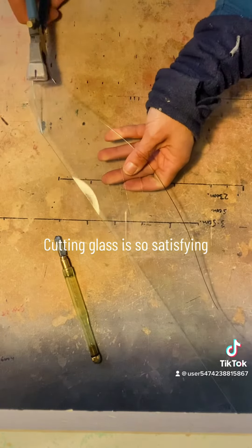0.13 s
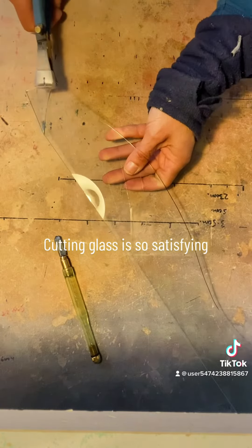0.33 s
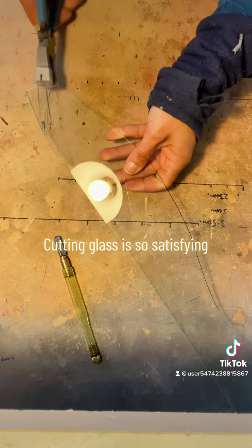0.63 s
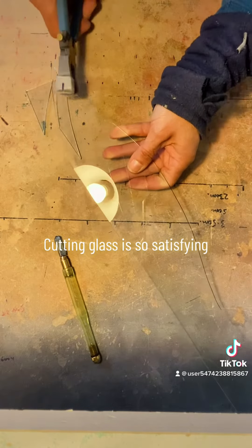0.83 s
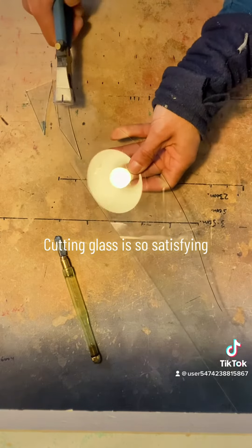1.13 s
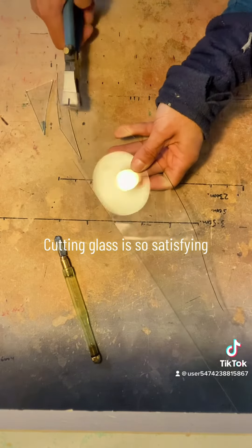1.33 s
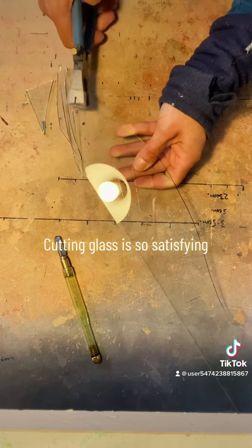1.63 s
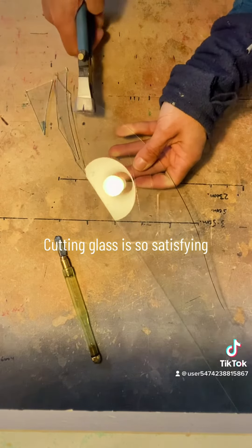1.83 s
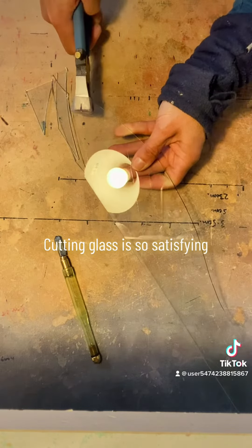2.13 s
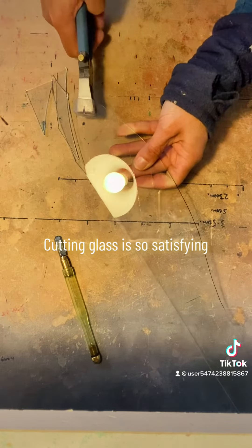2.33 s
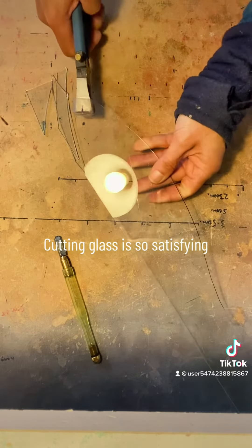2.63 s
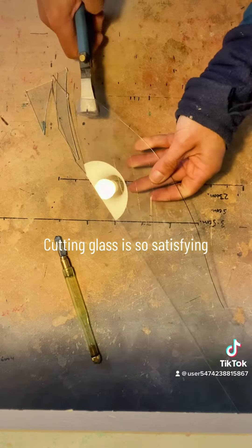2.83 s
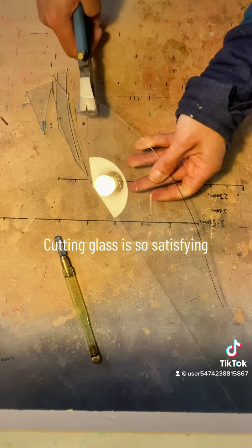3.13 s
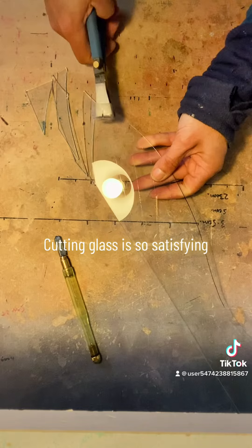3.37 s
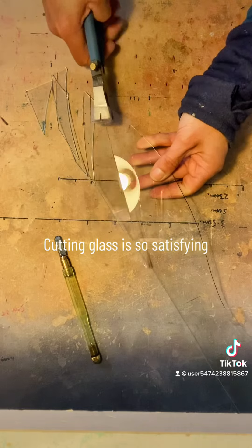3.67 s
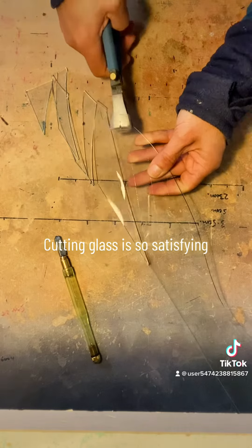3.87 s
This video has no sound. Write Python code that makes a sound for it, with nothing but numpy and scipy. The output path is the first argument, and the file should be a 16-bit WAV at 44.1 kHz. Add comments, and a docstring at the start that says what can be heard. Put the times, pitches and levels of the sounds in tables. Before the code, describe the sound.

Glass strips are snapped with pliers in sharp gritty cracks, each offcut then clinking and knocking onto a wooden bench, with small ticks and faint rustles between, heard close from above in a small workshop.

```python
"""Glass strips snapped and laid down

Pliers snap strips off a scored glass sheet: gritty noise swells and dies, the sheet's modes ring, splinters hiss.
Each offcut is laid on a wooden bench: decaying modes give its knocks and ring, noise bursts its buzz and cracks.
Small ticks and grainy rustles of handling lie between, over a low workshop rumble of shaped noise.
A diffuse room tail surrounds the near sounds; two microphone ports listen from above."""
import sys
import numpy as np
from scipy import signal
from scipy.fft import rfft, irfft
from scipy.io import wavfile

SR = 44100
rng = np.random.default_rng(int(sys.argv[2]) if len(sys.argv) > 2 else 0)


def store_pcm(level_fs):
    """Save levels as 16-bit WAV."""
    pcm = np.round(np.clip(level_fs, -1, 1) * 32767).astype(np.int16)
    wavfile.write(sys.argv[1], SR, np.atleast_2d(pcm).T)


N = 176400


def amp(db):
    """dB to gain."""
    return 10 ** (np.asarray(db) / 20)


def rms_one(x):
    """Scale to rms 1."""
    return x / np.sqrt(np.mean(x ** 2) + 1e-20)


def in_time(rows):
    """Interpolate (time, value) rows at every sample."""
    return np.interp(np.arange(N) / SR, *np.transpose(rows))


def at_hz(points, hz):
    """Interpolate (hz, value) points over log frequency."""
    points_hz, values = np.array(points).T
    return np.interp(np.log(hz + 1), np.log(points_hz), values)


def coloured(x, spectrum):
    """Give white input a spectrum; rms 1."""
    gain = amp(at_hz(spectrum, np.fft.rfftfreq(len(x), 1 / SR)))
    return rms_one(irfft(rfft(x) * gain, len(x)))


def drift(steps_per_s):
    """Normal random steps joined by straight lines."""
    steps = rng.standard_normal(2000)
    return np.interp(np.arange(N) / SR * steps_per_s, np.arange(len(steps)), steps)


RING_WAVERS_PER_S = 150


def struck(start_s, blow_db, modes, scatter_db, favoured_hz=None, focus_db_per_octave=0,
           damps_db=0, rise_s=1e-4, waver_db=0):
    """Blows ring modes, most near a favoured pitch; later blows damp them, loose contact makes them waver."""
    t = np.arange(SR // 3) / SR
    ringing = np.zeros((len(modes), N + SR))
    hz, level_db, t60_s = np.transpose(modes)[:, :, None]
    chance = rng.standard_normal((len(start_s), len(modes), 1))
    order = np.sort(start_s)
    for k, at_s in enumerate(start_s):
        off_db = 0
        if favoured_hz is not None:
            off_db = -focus_db_per_octave * abs(np.log2(hz / favoured_hz[k]))
        # count of later blows so far
        later = np.searchsorted(order, at_s + t) - np.searchsorted(order, at_s + 1e-4)
        gain_db = blow_db[k] + level_db + off_db + scatter_db * chance[k]
        gain_db = gain_db - 60 * t / t60_s - damps_db * np.maximum(later, 0)
        i = int(at_s * SR)
        ringing[:, i:i + len(t)] += amp(gain_db) * np.sin(2 * np.pi * hz * t) * np.minimum(t / rise_s, 1)
    out = np.zeros(N)
    for k, mode in enumerate(ringing):
        out += (-1) ** k * amp(waver_db * drift(RING_WAVERS_PER_S)) * mode[:N]
    return out


CRACK_RISE_S = .0006


def bursts(start_s, level_db, t60_s, spectrum, run_s=0, rise_s=CRACK_RISE_S):
    """Noise that rises fast, holds for run_s from its start, then dies; bursts add in power."""
    power, t = np.zeros(N), np.arange(SR // 4) / SR
    for at_s, db, decay_s in zip(start_s, level_db, t60_s + 0 * start_s):
        envelope = amp(db - 60 * np.maximum(t - run_s, 0) / decay_s) * np.minimum(t / rise_s, 1)
        i = int(at_s * SR)
        power[i:i + len(t)] += envelope[:N - i] ** 2
    return np.sqrt(power) * coloured(rng.standard_normal(N), spectrum)


# modes of held sheet and pliers: pitch_hz [Hz], level_db [dB, relative], t60_s [s]
SHEET_MODES = [(1800, -7, .04), (2350, -9, .04), (3350, -7, .04), (4500, -7, .035), (5400, -9, .03),
               (6100, -3, .035), (6750, -4, .03), (7600, -5, .03), (8750, -5, .03), (9900, -9, .03)]
# modes of bench top: pitch_hz [Hz], level_db [dB, relative], t60_s [s]
BENCH_MODES = [(213.3, -25, 0.11), (390.5, -25, 0.12), (660, -21, 0.057), (879, -19.5, 0.041),
               (1094.7, -4, 0.028), (1146, -9, 0.013), (1359, -7.5, 0.025), (1604, -0.5, 0.017),
               (1660, -19.5, 0.023), (2080, -12.5, 0.013), (2173, -3.5, 0.033), (2330, -6, 0.025),
               (2660, -7, 0.023), (3500, -12.5, 0.0067)]
GRAINS_PER_S_PER_MODE = 2500 / len(SHEET_MODES + BENCH_MODES)


def grains():
    """Grit under the glass: each grain rings one mode of the sheet or the bench top."""
    out = 0
    for hz, _, t60_s in SHEET_MODES + BENCH_MODES[1:]:
        r, w = amp(-60 / (t60_s * SR)), 2 * np.pi * hz / SR  # pole radius, angle
        hits = rng.random(N) < GRAINS_PER_S_PER_MODE / SR
        clicks = hits * rng.standard_normal(N)
        ring = signal.lfilter([np.sin(w)], [1, -2 * r * np.cos(w), r * r], clicks + 1e-18)
        out = out + np.sqrt(hz) * rms_one(ring)
    return rms_one(out)


# rustle of sleeve and shards: time_s [s], level_db [dB]
HANDLING = [(0, -54), (.14, -57), (.27, -72), (.41, -56), (.56, -66), (.66, -52), (.91, -67), (1.05, -64),
            (1.4, -57), (1.58, -53), (1.73, -52), (1.78, -56), (1.94, -85), (2.9, -90), (3.04, -80),
            (3.16, -60), (3.22, -49), (3.4, -52), (3.6, -58), (3.73, -46), (3.85, -44), (4, -55)]
# soft swells of grainy noise: start_s [s], length_s [s], level_db [dB]
SWELLS = [(0.519, 0.085, -50.5), (0.934, 0.053, -54), (2.19, 0.081, -73), (2.32, 0.07, -77.5),
          (2.38, 0.15, -60), (2.583, 0.035, -66), (2.629, 0.038, -52), (2.839, 0.14, -75),
          (2.969, 0.12, -54), (3.061, 0.054, -60), (3.518, 0.039, -69), (3.643, 0.072, -47.5)]
# rustle spectrum: freq_hz [Hz], density_db [dB per Hz, relative]
RUSTLE_SPECTRUM = [(180, -26.5), (350, -10), (1000, -17.5), (1800, -4.5), (3200, -8.5), (5400, -2),
                   (7200, -4), (8500, -10.5), (11000, -10), (15600, -14.5), (16500, -37.5)]
GRAIN_SHARE, RUSTLE_FLICKER_DB, RUSTLE_FLICKERS_PER_S = .45, 3, 120


def rustle():
    """Fine grains on hiss, following the handling level, with soft swells added."""
    t = np.arange(N) / SR
    source = GRAIN_SHARE * grains() + (1 - GRAIN_SHARE) * rng.standard_normal(N)
    level = amp(in_time(HANDLING))
    for start_s, length_s, level_db in SWELLS:
        level = level + amp(level_db) * np.sin(np.pi * np.clip((t - start_s) / length_s, 0, 1)) ** .5
    flicker = amp(RUSTLE_FLICKER_DB * drift(RUSTLE_FLICKERS_PER_S))
    return level * flicker * coloured(source, RUSTLE_SPECTRUM)


# rumble level: time_s [s], level_db [dB]
RUMBLE_LEVEL = [(0.0, -86), (0.07, -42), (0.13, -40.5), (0.3, -75), (0.34, -50.5), (0.49, -47),
                (0.6, -63.5), (0.69, -48), (0.71, -39.5), (0.89, -58), (0.93, -50.5), (1.05, -60.5),
                (1.12, -47), (1.17, -58), (1.38, -39), (1.54, -66.5), (1.65, -41), (1.77, -53.5),
                (1.88, -39), (1.9, -53), (2.13, -75.5), (2.48, -54.5), (2.57, -81.5), (2.64, -55.5),
                (2.83, -82), (2.87, -55.5), (3.0, -72.5), (3.03, -41), (3.19, -61.5), (3.29, -44.5),
                (3.31, -51.5), (3.54, -49.5), (3.65, -74), (3.73, -40), (3.81, -51), (3.83, -37),
                (3.89, -53.5), (4.0, -52)]
# rumble spectrum: freq_hz [Hz], density_db [dB per Hz, relative]
RUMBLE_SPECTRUM = [(12, -51.5), (22, -23), (36, -14), (60, -3), (108, -12), (147, 3), (248, -8.5),
                   (312, -23), (390, -17), (500, -22), (650, -55.5), (1100, -120)]


def rumble():
    """Low lumpy noise with a swelling and sinking level."""
    return amp(in_time(RUMBLE_LEVEL)) * coloured(rng.standard_normal(N), RUMBLE_SPECTRUM)


# bench top buzz: freq_hz [Hz], density_db [dB per Hz, relative]
BUZZ_SPECTRUM = [(150, -29.5), (350, -7.5), (700, -12), (1100, -1.5), (2300, -4), (3500, -10), (6000, -31)]
KNOCK_DB, KNOCK_SCATTER_DB = -10.5, 4.5
BUZZ_DB, BUZZ_T60_S = -20, 0.1


def knocks(start_s, knock_db):
    """The bench top's modes ring briefly and it buzzes."""
    ring = struck(start_s, knock_db + KNOCK_DB, BENCH_MODES, KNOCK_SCATTER_DB)
    return ring + bursts(start_s, knock_db + BUZZ_DB, BUZZ_T60_S, BUZZ_SPECTRUM)


# small ticks of pliers and shards: start_s [s], knock_db, crack_db [dB, relative]
TICKS = [(0.045, -35.5, -32.5), (0.529, -56, -22.5), (0.628, -54.5, -29), (0.645, -59, -28),
         (0.937, -98, -37.5), (0.973, -62, -43.5), (1.019, -75, -40.5), (1.079, -55, -46),
         (1.123, -66.5, -81), (1.139, -71, -34.5), (1.197, -54, -35.5), (1.268, -39.5, -49),
         (1.283, -50, -38), (1.325, -41, -59), (1.349, -31, -64.5), (1.547, -57, -32), (2.186, -65, -63.5),
         (2.222, -45.5, -50.5), (2.323, -51.5, -70), (2.41, -55.5, -56), (2.473, -56, -52),
         (2.607, -52, -43.5), (2.639, -48, -49.5), (2.701, -75, -58), (2.867, -58.5, -63.5),
         (3.155, -55, -28.5), (3.197, -36, -29), (3.425, -38, -34.5), (3.56, -62, -22), (3.625, -58, -32)]
# crack of glass: freq_hz [Hz], density_db [dB per Hz, relative]
CRACK_SPECTRUM = [(300, -29.5), (600, -22.5), (1200, -22.5), (2000, -5.5), (3000, -7), (5000, -6),
                  (6200, 1.5), (7500, -2.5), (9000, -5), (12000, -2.5), (15000, -6), (16500, -29)]
CRACK_DB = -6.5  # shared by ticks, touches, snaps
TICK_T60_S, TICK_RING_DB = .05, -10.5
SHEET_SCATTER_DB, RING_RISE_S, RING_WAVER_DB = 4.5, .001, 5


def ticks():
    """Faint contacts: a knock, a noise burst and a slight ring of the sheet."""
    start_s, knock_db, crack_db = np.transpose(TICKS)
    crack_db = crack_db + CRACK_DB
    ring = struck(start_s, crack_db + TICK_RING_DB, SHEET_MODES, SHEET_SCATTER_DB,
                  rise_s=RING_RISE_S, waver_db=RING_WAVER_DB)
    return knocks(start_s, knock_db) + bursts(start_s, crack_db, TICK_T60_S, CRACK_SPECTRUM) + ring


# an offcut touches the bench:
# start_s [s], knock_db, crack_db, ring_db [dB, relative], favoured_hz [Hz]
TOUCHES = [(0.086, -5, -39, -28.5, 4580), (0.105, -5, -9.5, -3.5, 4560), (0.112, -12, -16.5, -15.5, 9250),
           (0.14, -12.5, -21, -55, 9250), (0.146, -19.5, -41, -28, 4550), (0.33, -7, -5.5, -7, 11500),
           (0.696, -1.5, -54, -35, 6130), (0.73, -6.5, -3.5, -34, 6160), (0.736, -20.5, -11, -14.5, 8700),
           (0.755, -13, -12.5, -11, 9300), (0.773, -8.5, -11.5, -27, 9890), (0.785, -12, -20, -12, 6030),
           (0.793, -18, -10.5, -8, 9890), (0.801, -19.5, -16, -11, 10400), (0.812, -24.5, -36, -25, 6160),
           (0.823, -26.5, -31, -40, 9880), (0.836, -21.5, -23, -44, 6140), (0.859, -50, -39, -59, 9890),
           (1.604, -31.5, -25, -57, 5630), (1.642, -5, -48, -29.5, 5100), (1.671, -26, -25, -21.5, 7600),
           (1.687, -19.5, -19, -16, 8650), (1.701, -14.5, -10, -14, 9300), (1.717, -11.5, -16, -28, 8900),
           (1.724, -20, -15.5, -30, 8230), (1.825, -38, -42, -39, 7100), (1.839, -23.5, -51, -28.5, 8240),
           (1.852, -12, -14.5, -64, 7010), (3.235, -10.5, -50, -29, 3420), (3.267, -1.5, -51, -53, 4400),
           (3.276, -7.5, -45, -23, 6000), (3.328, -27, -10, -45, 5340), (3.333, -6.5, -9, -15, 6750),
           (3.343, -19, -7.5, -15.5, 6290), (3.374, -21, -12, -18, 8900), (3.399, -25, -43, -60, 8260),
           (3.675, -35, -21.5, -47, 5630), (3.69, -49, -21.5, -32, 2650), (3.716, -2.5, -16, -6.5, 6640),
           (3.72, -18, -10, -21.5, 2240), (3.737, -13, -18, -11.5, 6900), (3.811, -17.5, -17, -22, 6370),
           (3.818, -28.5, -18, -14, 6750), (3.823, -10, -8.5, -6, 9400), (3.841, -39, -21, -27, 5050),
           (3.874, -42, -16, -13.5, 7000), (3.88, -12.5, -10.5, -10.5, 7400),
           (3.918, -13.5, -25, -37, 6340), (3.943, -27.5, -31.5, -50, 2450)]
# each offcut: flat_s [s], modes (pitch_hz [Hz], level_db [dB, relative], t60_s [s])
OFFCUTS = [(.44, [(4602, -11, .17), (9241, 0, .11), (12265, -12, .12)]), (.862, [(4590, -14, .06),
           (6163, -7, .15), (7838, -11, .1), (9230, -10, .04), (9893, -1, .06)]), (1.88, [(3972, -13, .06),
           (5150, -4, .15), (6428, -15, .15), (7015, -11, .1), (8240, -2, .12), (9410, -13, .07),
           (11910, -3, .1), (12980, -3, .1)]), (3.403, [(2713, -8, .07), (3420, -8, .07), (6293, -3, .16),
           (8257, -6, .18), (10220, 1, .05)]), (3.95, [(1120, -6, .1), (1990, 1, .12), (2450, -8, .06),
           (3238, -3, .07), (4586, -11, .12), (5394, -14, .1), (5518, -13, .07), (6275, -3, .09),
           (6530, -11, .06), (7670, -14, .1), (8376, -7, .08), (10075, -9, .06), (10770, -10, .07),
           (12596, -8, .08), (13395, -5, .06)])]
# glass on wood: freq_hz [Hz], density_db [dB per Hz, relative]
CLINK_SPECTRUM = [(300, -39), (700, -18), (1500, -5), (3000, -2), (5000, -3.5), (7000, -5.5), (10000, -4),
                  (15600, -17), (16500, -30)]
TOUCH_T60_S, AT_REST_T60_S = .028, .07
RING_SCATTER_DB, FOCUS_DB_PER_OCTAVE, TOUCH_DAMPS_DB = 2, 12.5, 4.5


def touches():
    """Knock of the bench, a short crack and the ring of the offcut, which dies faster once it lies flat."""
    start_s, knock_db, crack_db, ring_db, favoured_hz = np.transpose(TOUCHES)
    out = knocks(start_s, knock_db) + bursts(start_s, crack_db + CRACK_DB, TOUCH_T60_S, CLINK_SPECTRUM)
    since_s = 0
    for flat_s, modes in OFFCUTS:
        now = (start_s >= since_s) & (start_s < flat_s)
        rest = amp(-60 * np.maximum(np.arange(N) / SR - flat_s, 0) / AT_REST_T60_S)
        ring = struck(start_s[now], ring_db[now], modes, RING_SCATTER_DB, favoured_hz[now],
                      FOCUS_DB_PER_OCTAVE, TOUCH_DAMPS_DB, RING_RISE_S, RING_WAVER_DB)
        out = out + rest * ring
        since_s = flat_s
    return out


# score line breaks:
# start_s [s], knock_db, crack_db [dB, relative], crack_t60_s [s], favoured_hz [Hz]
SNAPS = [(0.452, -13, -6.5, 0.077, 3420), (0.505, -62, -16.5, 0.063, 5630), (1.408, -17, -5.5, 0.035, 6500),
         (3.014, -16.5, -5.5, 0.053, 6500), (3.505, -9.5, -4, 0.046, 4010)]
SNAP_RUN_S, SNAP_RISE_S = 0.0045, 0.0018
GRIT_DB, GRIT_PER_S = 2.5, 300
SHEET_DB, SHEET_FOCUS_DB_PER_OCTAVE = -1, 4.5
SPLINTERS_DB, SPLINTERS_T60_S = -23, .3


def snaps():
    """A gritty crack runs along the score, rings the sheet and jolts the bench; splinters hiss on."""
    start_s, knock_db, crack_db, t60_s, favoured_hz = np.transpose(SNAPS)
    crack_db = crack_db + CRACK_DB
    crack = bursts(start_s, crack_db, t60_s, CRACK_SPECTRUM, SNAP_RUN_S, SNAP_RISE_S)
    crack = crack * amp(GRIT_DB * drift(GRIT_PER_S))
    sheet = struck(start_s, crack_db + SHEET_DB, SHEET_MODES, SHEET_SCATTER_DB, favoured_hz,
                   SHEET_FOCUS_DB_PER_OCTAVE, rise_s=SNAP_RISE_S, waver_db=RING_WAVER_DB)
    splinters = bursts(start_s, crack_db + SPLINTERS_DB, SPLINTERS_T60_S, CRACK_SPECTRUM)
    splinters = splinters * amp(GRIT_DB * drift(GRIT_PER_S))
    return knocks(start_s, knock_db) + crack + sheet + splinters


# room decay: freq_hz [Hz], t60_s [s]
ROOM_T60 = [(200, 0.63), (1000, 0.15), (4000, 0.23), (14000, 0.15)]
ROOM_DB, ROOM_ALIKE, ROOM_RISE_S = -10.5, .3, .0011  # ROOM_ALIKE: left-right correlation


def room(x):
    """A diffuse tail that dies by band, partly different on each side."""
    t, tail = np.arange(SR // 2) / SR, 0
    common, apart = rng.standard_normal((2, len(t)))
    white = np.sqrt(1 + ROOM_ALIKE) * common + np.sqrt(1 - ROOM_ALIKE) * apart * [[1], [-1]]
    for low_hz in 100 * 2. ** np.arange(8):
        edges_hz = [low_hz, min(2 * low_hz, .45 * SR)]
        band = signal.sosfilt(signal.butter(2, edges_hz, "band", fs=SR, output="sos"), white)
        decay = amp(-60 * t / at_hz(ROOM_T60, 1.6 * low_hz))
        tail = tail + band * decay * np.minimum(t / ROOM_RISE_S, 1)
    tail = tail / np.sqrt(np.sum(tail ** 2) / 2)  # mean energy 1 per side
    return signal.fftconvolve(x[None], tail, axes=1)[:, :N]


def scene():
    """Contacts and rustle in the room, rumble beneath."""
    near = rustle() + ticks() + touches() + snaps()
    return near + amp(ROOM_DB) * room(near) + rumble()


# port phase: freq_hz [Hz], left_lead_rad [rad]
PORT_PHASE = [(100, 0), (500, 0), (1500, -.6), (2400, -1.1), (2800, -2.2), (3300, -.4), (4600, .1),
              (7300, -.1), (9500, -1.2), (12500, -2.8), (14000, -3.1)]
# port balance: freq_hz [Hz], left_minus_right_db [dB]
PORT_BALANCE = [(250, 0), (600, 4), (1400, 3.5), (2200, 2), (3000, 4), (4200, .5), (5200, 1.5), (7000, 0)]
CEILING, STOPBAND_HZ, STOPBAND_DB = .95, 16900, 70


def record(dry):
    """The two ports differ in level and phase by band; peaks are rounded, the top is cut."""
    hz, side = np.fft.rfftfreq(N, 1 / SR), np.array([[.5], [-.5]])
    ports = amp(side * at_hz(PORT_BALANCE, hz)) * np.exp(1j * side * at_hz(PORT_PHASE, hz))
    heard = irfft(rfft(dry) * ports, N)
    rounded = CEILING * np.tanh(heard / CEILING)
    lowpass = signal.cheby2(12, STOPBAND_DB, STOPBAND_HZ, fs=SR, output="sos")
    return signal.sosfilt(lowpass, rounded)


dry = scene()
out = record(dry)
store_pcm(out)
```